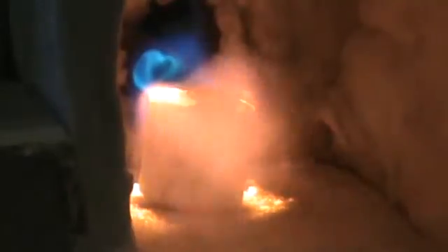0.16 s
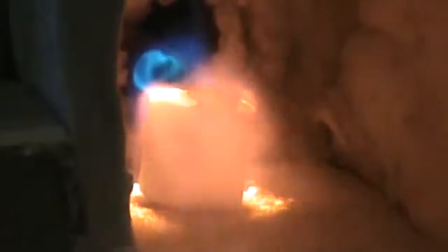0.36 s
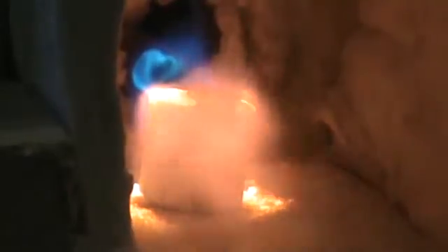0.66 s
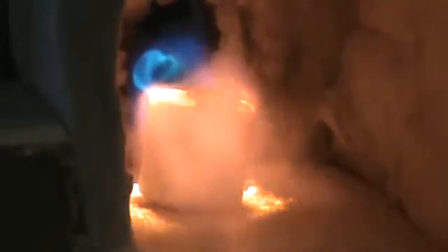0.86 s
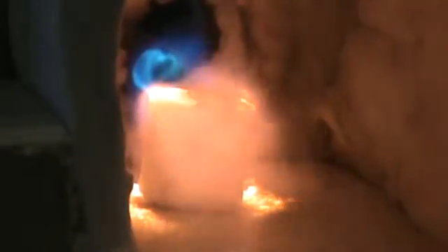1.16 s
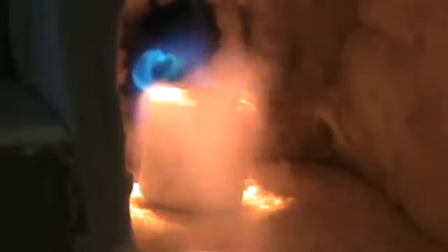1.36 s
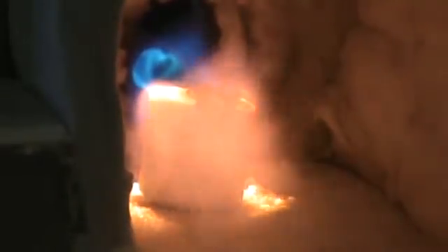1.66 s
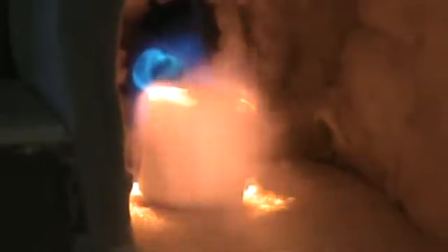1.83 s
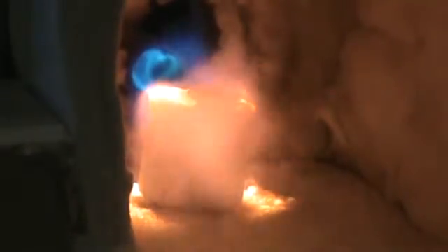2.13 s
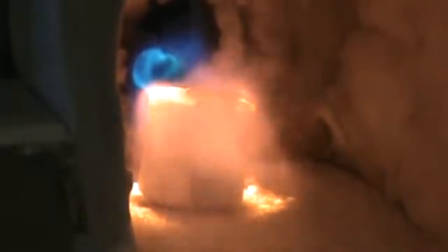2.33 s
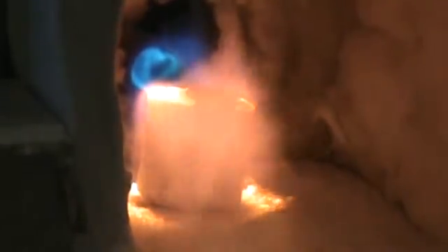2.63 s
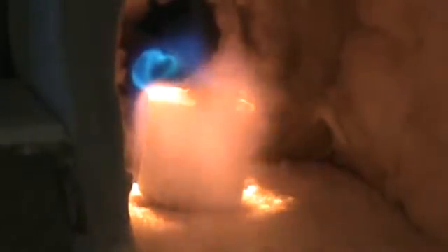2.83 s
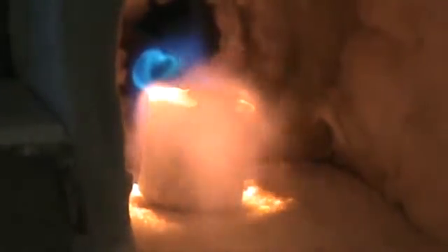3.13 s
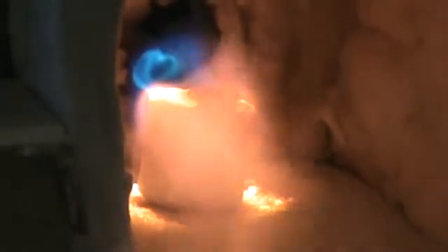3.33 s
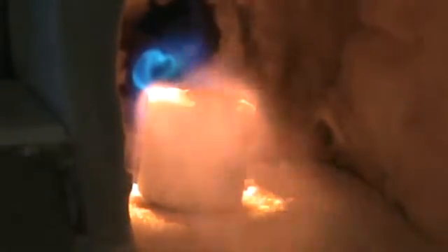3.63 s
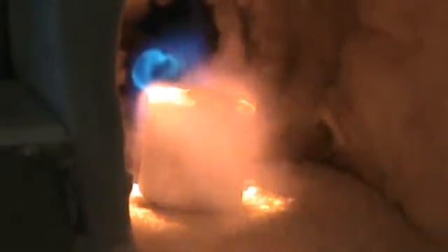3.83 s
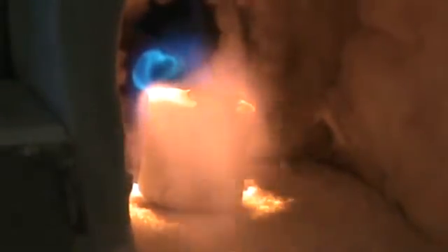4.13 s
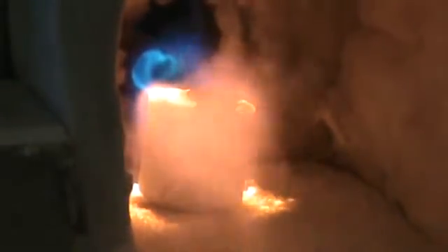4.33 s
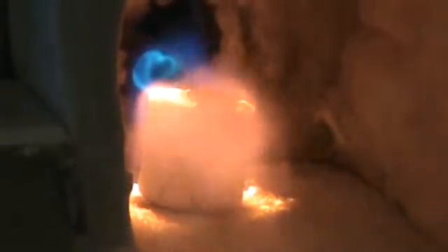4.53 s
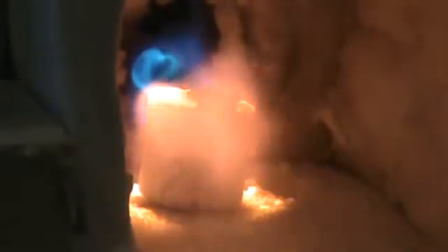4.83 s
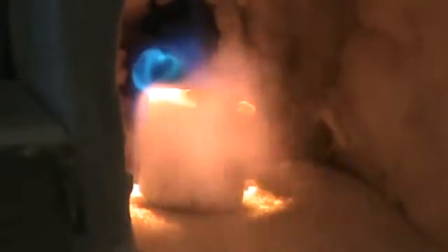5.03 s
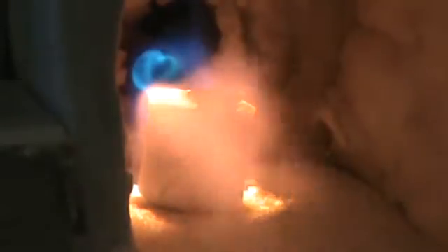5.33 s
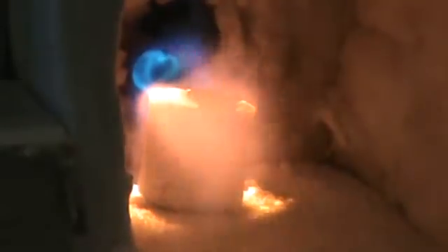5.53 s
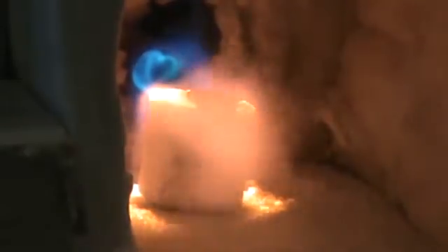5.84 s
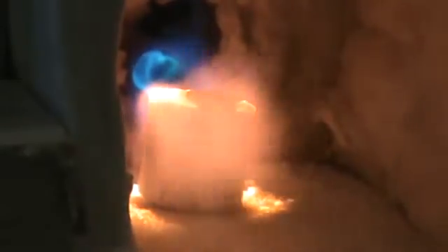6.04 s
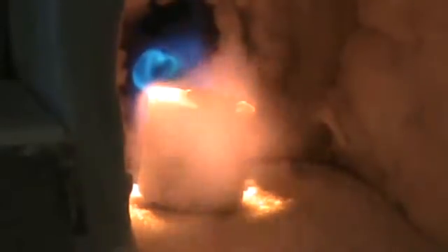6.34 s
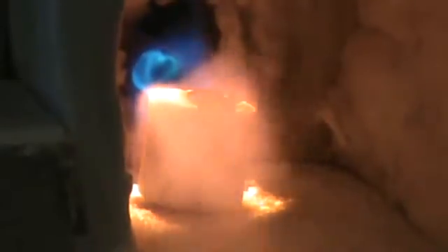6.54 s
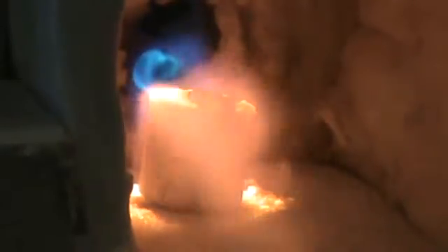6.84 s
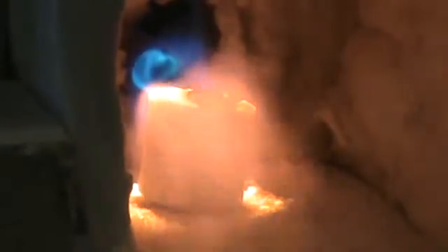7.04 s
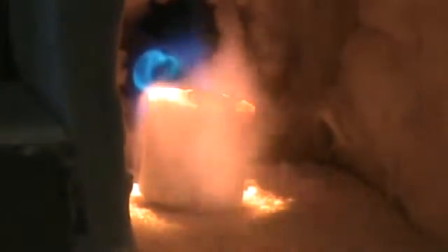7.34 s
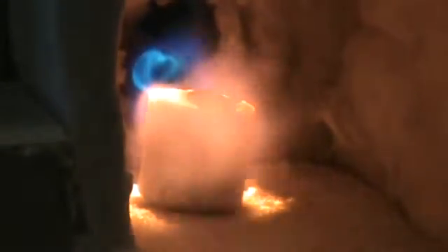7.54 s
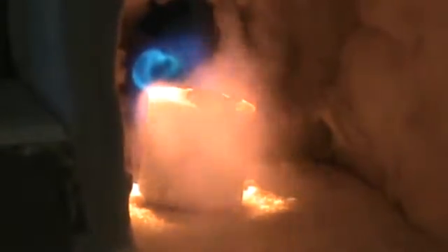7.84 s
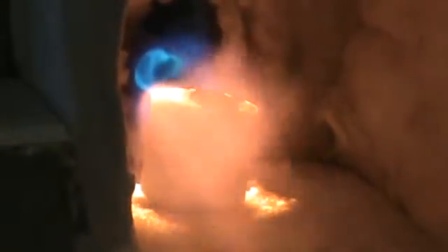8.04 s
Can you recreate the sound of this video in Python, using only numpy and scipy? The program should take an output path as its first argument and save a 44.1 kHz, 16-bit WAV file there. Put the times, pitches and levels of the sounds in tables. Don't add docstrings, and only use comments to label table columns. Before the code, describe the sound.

A gas torch burns into a small brick furnace, heard very close in stereo. A loud, hollow low-mid roar runs unbroken with slight swelling, under a much quieter fine gas hiss. A faint rub comes near 1.4 seconds, the hiss turns airier from about 2.3 to 3.3, then three quick scuffs brush a rough surface around 3.5. The roar simply continues to the end.

```python
import sys
import numpy as np
from scipy import signal
from scipy.fft import rfft, irfft, next_fast_len
from scipy.io import wavfile
from scipy.ndimage import uniform_filter1d

SR = 44100
rng = np.random.default_rng(int(sys.argv[2]) if len(sys.argv) > 2 else 0)


def gain_from_decibels(decibels):
    exponent = np.asarray(decibels, float) / 20
    return 10 ** exponent


def file_out(sig):
    cols = np.atleast_2d(sig).T
    lim = np.clip(cols, -1, 1)
    pcm = np.round(lim * 32767).astype(np.int16)
    wavfile.write(sys.argv[1], SR, pcm)


N = 361179
FRAME_HZ = np.fft.rfftfreq(512, 1 / SR)
HZ = np.fft.rfftfreq(next_fast_len(N), 1 / SR)


def evened(x):
    return x / np.sqrt(np.mean(x ** 2) + 1e-20)


def read(points, hz):
    point_hz, value = np.transpose(points)
    return np.interp(np.log(hz + 1), np.log(point_hz + 1), value)


def spells(rows, t, edge_s):
    total = 0
    for start, length, height in rows:
        to_edge_s = np.minimum(t - start, start + length - t)
        total = total + height * np.clip(to_edge_s / edge_s, 0, 1)
    return total


def two_part(rows, split_hz, width_hz, follows):
    s, db = np.transpose(rows)
    upper = np.clip((FRAME_HZ[:, None] - split_hz) / width_hz, 0, 1)
    return lambda t: (1 + (follows - 1) * upper) * np.interp(t, s, db)


def turbulence(field_db, patchy_db, flicker_db):
    t = np.arange(N // 176 + 5) * 176 / SR
    real, imag = rng.standard_normal((2, 3, len(FRAME_HZ), len(t)))
    patches = rng.standard_normal((len(FRAME_HZ), len(t)))
    patches = uniform_filter1d(patches, size=7, axis=0)
    patches = evened(uniform_filter1d(patches, size=22, axis=1))
    flicker = evened(uniform_filter1d(rng.standard_normal(len(t)), size=7))
    level_db = field_db(t) + patchy_db * patches + flicker_db * flicker
    frames = (real + 1j * imag) * gain_from_decibels(level_db)
    noise = signal.istft(frames, nperseg=512, noverlap=336)[1][:, :N]
    return rfft(noise, next_fast_len(N))


def ports(noise, spectrum, modes, ripple_db):
    # hz, lead_rad
    lead = [(30, 0), (140, .9), (225, 1.1), (500, .4), (530, 2), (555, -.65), (640, -1), (690, 0),
            (1060, .1), (1120, 1.1), (1290, .4), (1325, 2.4), (1365, -1.8), (1400, 0)]
    # hz, left_minus_right_db
    lean = [(60, -3), (140, 0.3), (260, 2.5), (400, 0), (700, 0.3), (3000, -0.8), (9000, 0.3)]
    # hz, shared_power_0_to_1
    likeness = [(30, 0.45), (100, 0.95), (140, 0.97), (480, 0.96), (1100, 0.84), (2600, 0.71), (5000, 0.59),
                (9000, 0.75), (13000, 1)]
    side = np.array([[0.5], [-0.5]])
    colour_db = read(spectrum, HZ) + side * read(lean, HZ)
    for hz, width_hz, *db in modes:
        near = abs(HZ - hz) < 2 * width_hz
        bell = 0.5 ** ((2 * (HZ[near] - hz) / width_hz) ** 2)
        colour_db[:, near] += np.outer(db, bell)
    walls = uniform_filter1d(rng.standard_normal((3, len(HZ))), size=110)
    walls = uniform_filter1d(walls, size=110)
    walls = walls - uniform_filter1d(walls, size=1500)
    colour_db = colour_db + ripple_db * evened(walls[0] + 0.7 * walls[1:])
    same = np.clip(read(likeness, HZ), 0, 1)
    direct = np.sqrt(same) * noise[0] * np.exp(1j * side * read(lead, HZ))
    scattered = np.sqrt(1 - same) * noise[1:]
    return (direct + scattered) * gain_from_decibels(colour_db)


def level(pair, lo_hz, hi_hz):
    band = pair.mean(0) * (HZ > lo_hz) * (HZ < hi_hz)
    return irfft(pair, next_fast_len(N))[:, :N] / irfft(band).std()


def scuffs():
    # start_s, length_s, level_db
    strokes = [
        (1.357, 0.07, -43),
        (3.48, 0.075, -39.5),
        (3.55, 0.117, -42.5),
        (3.668, 0.11, -41.5),
    ]
    # hz, level_db_per_hz
    rub_spectrum = [(1500, -20), (2500, 3), (3500, -2), (5500, -4.5), (7000, -3), (10000, -16),
                    (14000, -40)]
    t = np.arange(N) / SR
    rows = [(start, length, gain_from_decibels(db)) for start, length, db in strokes]
    stroke = spells(rows, t, edge_s=0.022)
    grain = gain_from_decibels(1.9 * evened(uniform_filter1d(rng.standard_normal(N), size=200)))
    noise = rfft(rng.standard_normal((3, N)) * grain, next_fast_len(N))
    middle, left, right = noise * gain_from_decibels(read(rub_spectrum, HZ))
    pair = np.array([middle + 0.77 * left, middle + 0.45 * right])
    return stroke * level(pair, 2160, 6600)


def jet():
    # time_s, swell_db
    pressure = [(0, 0.1), (0.8, -0.1), (2.1, 0.5), (2.7, 1.4), (2.9, 1), (3.15, 1.5), (3.35, 0.5),
                (4.1, 0.5), (4.9, -0.6), (5.2, 0.8), (5.45, -0.5), (6.0, 0), (7.1, 0), (7.4, 0),
                (8.19, -0.5)]
    # start_s, length_s, lift_db
    fizz = [
        (2.28, 0.5, 10),
        (2.87, 0.41, 10),
    ]
    # hz, level_db_per_hz
    hiss = [(2500, -0.5), (4000, -6), (6000, -2), (7500, -1), (10250, -5.5), (10450, -12), (11400, -9),
            (12050, -15), (12600, -17), (13150, -19), (13600, -25), (15000, -33), (16000, -39)]
    # hz, width_hz, left_db, right_db
    nozzle = [(2565, 48, -5, -3), (2700, 43, -3, -6), (2880, 650, 1.5, 4), (3576, 160, 3.5, 7.5),
              (4620, 140, 5, 6), (6009, 480, -5.6, -7), (6480, 390, 4.9, 2.5), (6820, 89, 5, 4),
              (6952, 162, -5, -3.3), (7240, 182, -3, -5), (7580, 320, 5.6, 3), (3120, 90, -5, -2),
              (4170, 200, -1, -3), (8163, 121, -2.4, -4), (8482, 88, 4.5, 3), (9354, 203, 2, 3),
              (10350, 110, 1.5, 3)]
    flow = two_part(pressure, 8400, 4000, follows=1.9)
    top = np.clip((FRAME_HZ[:, None] - 12600) / 1800, 0, 1)

    def field_db(t):
        return flow(t) + top * spells(fizz, t, edge_s=0.08)

    noise = turbulence(field_db, patchy_db=0.75, flicker_db=0.3)
    pair = ports(noise, [(1000, -40), (2200, -12)] + hiss, nozzle, ripple_db=3.0)
    return gain_from_decibels(-43.5) * level(pair, 6200, 10200)


def flame():
    # time_s, swell_db
    roar_swell = [(0, -0.3), (0.7, -1.3), (1.5, -0.84), (2.1, 0.5), (2.5, -0.5), (3.0, 1), (3.7, 0),
                  (4.7, 0.65), (5.1, 0.1), (5.6, 1), (6.0, -0.3), (6.4, 0.5), (7.2, 0.1), (7.73, -1.8),
                  (8.19, -0.2)]
    # hz, level_db_per_hz
    roar = [(25, -28), (50, -35), (75, -21.5), (115, -30), (135, -8.5), (300, -3), (480, 0.0), (800, -14),
            (1300, -23), (1600, -22), (2700, -36.0)]
    # hz, width_hz, left_db, right_db
    cavity = [(193.7, 37, -4, -3), (347, 17, 1, -4), (459.8, 16.4, 3.5, 1), (469, 98, 6.0, 3),
              (516, 25, -6.5, -1.5), (534, 25, 1.1, -8.5), (569, 80, 8, 6), (633, 19, 1.5, -7),
              (671, 25, 2, 6.5), (781, 28, 3.5, 8), (828, 25, -6, -10), (888.3, 46, 10.5, 7.5),
              (996, 63, 6.5, 10), (1057, 24, 6, 2.5), (1091, 32, -2, 11.5), (1158, 25, 5.5, -2),
              (1235, 22, -4, -6), (1254, 42, 5.5, 5), (1357, 16, -3, 4), (1429, 33, 4.5, 9.5),
              (1547, 176, 7, 8), (1630, 17, -8, -5.7), (1733, 35, 4.5, 8), (1844, 28, 4, 4.5),
              (1882, 72, 3, 3.5), (1970, 37, 3.8, 4.0), (2017, 16, 6.5, 7), (2136, 47, 1.5, 8.5),
              (2318, 86, 1.7, 8), (2633, 25, 0.9, 8.4)]
    catch_s, catch_db = 0.1, -3
    swell = two_part(roar_swell, 580, 330, follows=-0.64)
    low = FRAME_HZ[:, None] < 750

    def field_db(t):
        return swell(t) + low * catch_db * np.clip(1 - t / catch_s, 0, 1)

    noise = turbulence(field_db, patchy_db=0.3, flicker_db=-0.01)
    upper_end = [(2350, -33), (2480, -42), (2700, -46), (3100, -58), (5000, -80)]
    pair = ports(noise, roar[:-1] + upper_end, cavity, ripple_db=1.1)
    return gain_from_decibels(-16.0) * level(pair, 250, 750)


def scene():
    return scuffs() + jet() + flame()


def limited(x):
    peak_db = 20 * np.log10(abs(x).max(0) + 1e-6)
    fall_db = np.arange(N) * 60 / SR
    held_db = np.maximum.accumulate(peak_db + fall_db) - fall_db
    over_db = np.maximum(held_db + 6.5, 0)
    return x * gain_from_decibels(1.33 - 0.52 * uniform_filter1d(over_db, size=90))


def thinned(x):
    # start_s, length_s
    folds = [(0.33, 0.1), (0.7, 0.03), (0.78, 0.12), (0.97, 0.03), (1.04, 0.05), (2.17, 0.09), (2.69, 0.07),
             (2.97, 0.07), (3.11, 0.11), (3.48, 0.11), (4.23, 0.2), (4.7, 0.04), (5.1, 0.12), (5.53, 0.04),
             (5.98, 0.12), (6.32, 0.05), (6.78, 0.19), (7.38, 0.07), (7.92, 0.04)]
    middle_side = np.array([x[0] + x[1], x[0] - x[1]]) / 2
    hz, t, (mid, side) = signal.stft(middle_side, SR, nperseg=1024)
    folded = sum((t > start) & (t < start + length) for start, length in folds)
    spell = np.outer(hz > 4200, folded)
    row, column = np.arange(len(hz))[:, None] // 4, np.arange(len(t)) // 6
    tile = row * (column.max() + 1) + column
    power = np.bincount(tile.ravel(), abs(mid.ravel()) ** 2)
    tile_db = 10 * np.log10(power / np.bincount(tile.ravel()))
    tile_db += 3.0 * rng.standard_normal(len(tile_db))
    limit_db = np.median(tile_db[tile[(hz > 11000) & (hz < 11500)]]) - 8.5
    kept = (tile_db[tile] > limit_db) | (hz[:, None] < 9000)
    pair = np.array([mid * kept, side * kept * (spell == 0)])
    mid, side = signal.istft(pair, SR, nperseg=1024)[1][:, :N]
    return np.array([mid + side, mid - side])


def band_limit(x):
    return signal.sosfilt(signal.butter(12, 14850, fs=SR, output="sos"), x)


def record(dry):
    mix = thinned(limited(dry))
    return band_limit(mix)


dry = scene()
out = record(dry)
file_out(out)
```